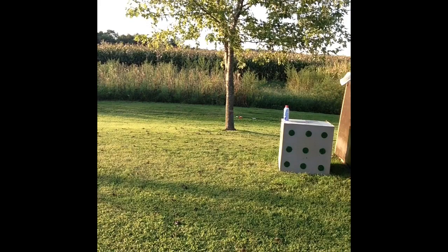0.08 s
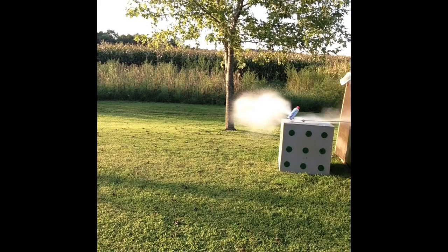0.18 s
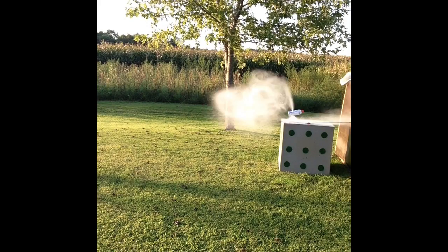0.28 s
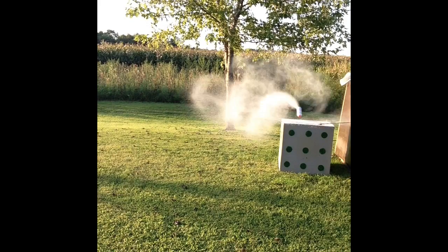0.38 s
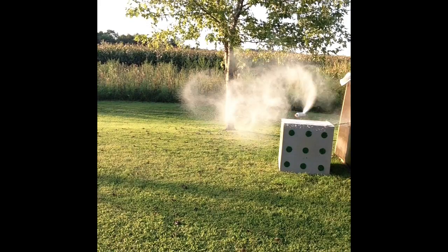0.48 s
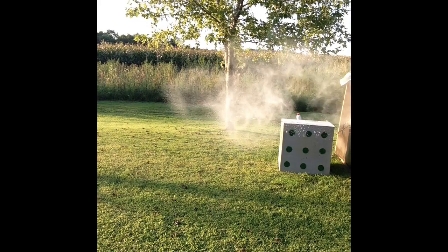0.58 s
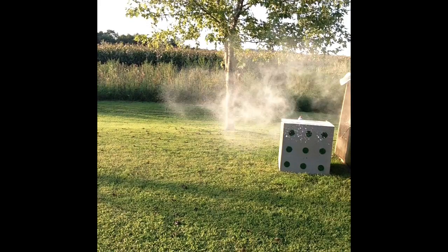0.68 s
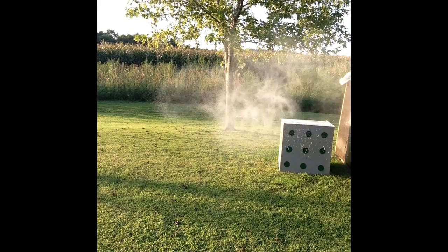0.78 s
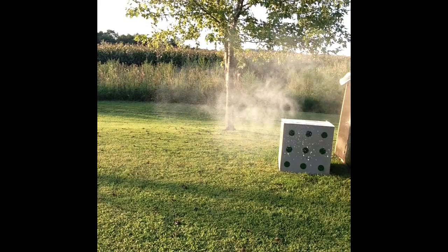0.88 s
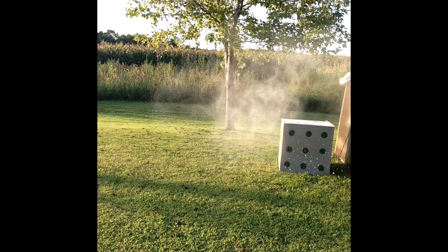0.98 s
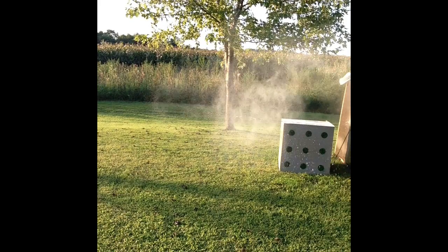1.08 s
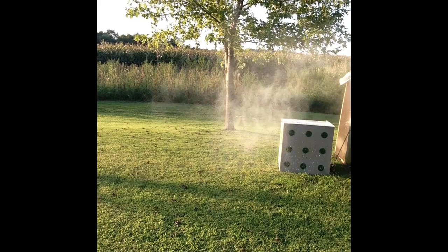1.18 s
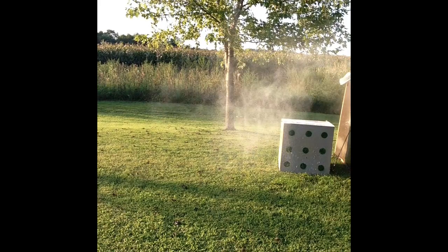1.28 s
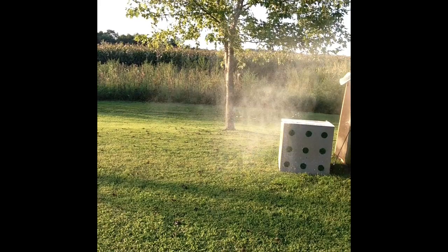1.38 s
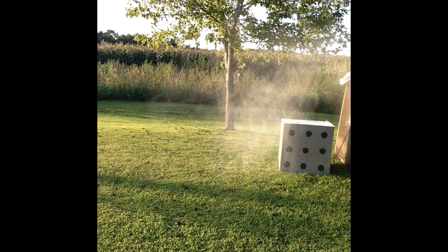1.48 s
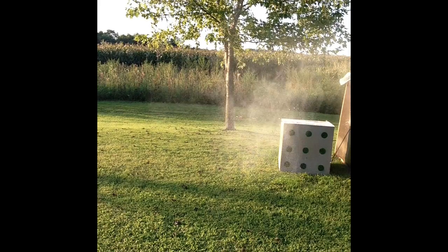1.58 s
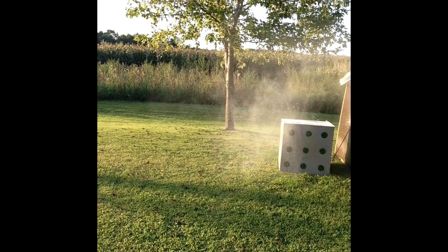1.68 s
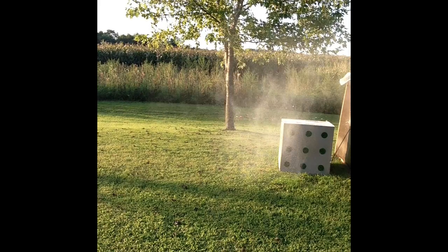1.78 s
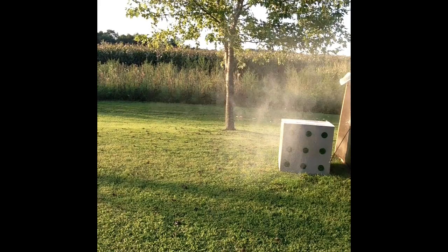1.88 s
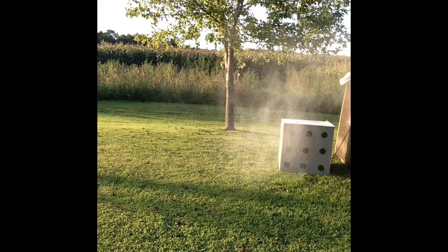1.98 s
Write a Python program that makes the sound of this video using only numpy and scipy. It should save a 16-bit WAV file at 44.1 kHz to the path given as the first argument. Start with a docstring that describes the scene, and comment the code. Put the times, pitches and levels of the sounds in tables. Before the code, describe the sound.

A pressurized plastic bottle is struck and bursts with a sharp bang outdoors among chirring crickets

```python
"""Bursting bottle in a back yard

An arrow strikes a pumped-up plastic bottle of powder on a foam block; it cracks, then bursts.
Bottle, foam and fallen pieces are sums of decaying modes; the freed air is one swing of sagging pitch.
The rush of air and the long echo of trees and corn are noise shaped in time and frequency.
Crickets chirr throughout: two near tones with pulsed envelopes before a chorus of narrow noise bands.
"""
import sys
import numpy as np
from scipy import signal
from scipy.io import wavfile
from scipy.ndimage import uniform_filter1d

SR = 44100
rng = np.random.default_rng(int(sys.argv[2]) if len(sys.argv) > 2 else 0)


def to_wav(sig):
    """Store sig (one row per channel, or 1-D mono) as 16-bit WAV at the path in sys.argv[1].

    Samples outside -1..1 are clipped; the rate is SR.
    """
    pcm = np.clip(np.atleast_2d(sig), -1, 1) * 32767
    pcm = np.round(pcm).astype(np.int16)
    wavfile.write(sys.argv[1], SR, pcm.T)  # frames by channels


def boost_factor(decibels):
    """Convert a level in decibels to a linear amplitude factor."""
    exponent = np.asarray(decibels, float) / 20
    return 10 ** exponent


N = 88200
TIME = np.arange(N) / SR


def evened(x):
    """Normalization: scales a signal to unit rms."""
    return x / np.sqrt(np.mean(x ** 2) + 1e-20)


def curve(points, t):
    """Piecewise-linear interpolation: reads a level contour at the times t."""
    return np.interp(t, *np.transpose(points))


NEAR_S, FAR_S = 0.33, 0.87  # a drifting colour moves from the first to the second between these times


def hiss(hue, later_hue=None, patchy_db=1.0, flicker_db=0.0, size=512):
    """Short-time spectral synthesis: random spectra of one colour, or drifting to a second, in patches."""
    hop = size // 4
    frames, hz = N // hop + 5, np.fft.rfftfreq(size, 1 / SR)
    real, imag, patches = rng.standard_normal((frames, len(hz), 3)).T  # each is (frequency, frame)
    patches = uniform_filter1d(patches, size // 64, 0)
    patches = evened(uniform_filter1d(patches, 4096 // size, 1))
    flicker = evened(uniform_filter1d(rng.standard_normal(frames), 3))

    def spectrum_db(points):
        point_hz, point_db = np.transpose(points)
        return np.interp(np.log(hz + 1), np.log(point_hz), point_db)[:, None]

    early, late = spectrum_db(hue), spectrum_db(later_hue or hue)
    share = np.clip((np.arange(frames) * hop / SR - NEAR_S) / (FAR_S - NEAR_S), 0, 1)
    gain = boost_factor(early + (late - early) * share)
    gain = gain / np.sqrt(np.mean(gain ** 2, 0))  # equal power in every frame
    spectra = (real + 1j * imag) * gain * boost_factor(patchy_db * patches + flicker_db * flicker)
    return evened(signal.istft(spectra, nperseg=size, noverlap=size - hop)[1][:N])


def decaying_mode(hz, db, t60, t):
    """Damped oscillation: a sine that loses 60 dB in t60 seconds."""
    return boost_factor(db - 60 * t / t60) * np.sin(2 * np.pi * hz * t)


def strike(events, modes_of, rise_s):
    """Modal superposition: each event (time, strength, ..) rings its modes after a linear rise."""
    out, t = np.zeros(N + SR), np.arange(SR // 4) / SR
    for event in events:
        ring = sum(decaying_mode(hz, db, t60, t) for hz, db, t60 in modes_of(event))
        start = round(event[0] * SR)
        out[start:start + len(t)] += boost_factor(event[1]) * np.minimum(t / rise_s, 1) * ring
    return out[:N]


def favoured(modes, centre_hz):
    """Selective excitation: modes speak less, the more octaves they lie from the favoured pitch."""
    loss_db_per_octave = 7.5
    return [(hz, db - loss_db_per_octave * abs(np.log2(hz / centre_hz)), t60) for hz, db, t60 in modes]


# colour of the air, with a low far drone: (frequency [Hz], relative level [dB])
AIR_HUE = [(30, -8), (70, 7), (115, 9), (180, -5), (400, -4.5), (1000, -11), (1700, -11), (3000, -5.5),
           (4800, 4), (6700, 7.5), (7500, 1.5), (9000, -42.5)]


def air():
    """Stationary ambient noise: the air of the yard as a steady coloured hiss."""
    return boost_factor(-62) * hiss(AIR_HUE, patchy_db=3.4, size=2048)


# colour of a soft rustle: (frequency [Hz], relative level [dB])
RUSTLE_HUE = [(150, -51), (250, -20), (496, 6), (646, -7.5), (953, 1), (1430, -0.5), (1800, -6), (2340, 2),
              (3960, -120)]


def rustle():
    """Gated noise: a soft rustle from the start that stops at 0.38 s."""
    return boost_factor(-60.5) * hiss(RUSTLE_HUE, patchy_db=1.0) * (TIME < 0.38)


# bands of far insects: (centre [Hz], bandwidth [Hz], level [dB])
INSECT_BANDS = [(1990, 150, -68), (2300, 260, -60.5), (2666, 260, -61), (3370, 250, -61.5), (3636, 74, -65),
                (3800, 460, -58), (3830, 74, -62), (4235, 300, -62.5)]


def chorus():
    """Incoherent superposition: many far insects blur into throbbing resonant noise bands."""
    out = np.zeros(N)
    for hz, width, db in INSECT_BANDS:
        radius = np.exp(-np.pi * width / SR)
        noise = [1, 1j] @ rng.standard_normal((2, N))
        noise = signal.lfilter([1], [1, -2 * radius, radius * radius], noise)
        band = evened((noise * np.exp(2j * np.pi * hz * TIME)).real)  # shifted up to its centre
        throb = uniform_filter1d(rng.standard_normal(N), 900)
        throb = evened(uniform_filter1d(throb, 900))
        out += boost_factor(db + 2.2 * throb) * band
    return out


# near singers: (centre of first chirp [s], period [s], mean pitch [Hz], chirp length [s], mean level [dB])
NEAR_CRICKETS = [(.020, .0719, 3865, .026, -50), (.025, .1343, 3645, .045, -51)]


def crickets():
    """Amplitude modulation: two near singers pulse nearly pure tones, each at its own steady rate."""
    out = np.zeros(N)
    for first, period, hz, length, db in NEAR_CRICKETS:
        since = TIME - first + period / 2
        count = (since // period).astype(int) + 1
        strength = boost_factor(db + 1.6 * rng.standard_normal(count.max() + 1))[count]  # differs per chirp
        u = np.clip((since % period - period / 2) / length, -0.5, 0.5)
        waver_hz = 12 * evened(uniform_filter1d(rng.standard_normal(N), 1500))
        tone = np.sin(2 * np.pi * np.cumsum(hz + waver_hz) / SR)
        out += strength * np.cos(np.pi * u) ** 2 * tone
    return out


# pieces landing on the grass: (time [s], strength [dB], softness [0-1])
LANDINGS = [(1.134, -39.5, .1), (1.140, -42, 0), (1.180, -43.5, 1), (1.203, -42.5, 0.17),
            (1.215, -37, 0.45), (1.221, -42, 0), (1.234, -42, 0.3), (1.242, -36, 0.33), (1.252, -59, 0.4),
            (1.262, -43, 0.67), (1.28, -47.5, 1), (1.345, -51, 0.7), (1.37, -58, 1), (1.395, -54, 1)]
# plastic modes before random detuning: (frequency [Hz], level [dB], decay T60 [s])
PIECE_MODES = [(366, 1, 0.054), (447, 1, 0.046), (586, 1.5, 0.033), (760, -11, 0.027), (940, -8, 0.048)]


def pieces():
    """Impact excitation: hard landings ring the plastic, soft ones only push the turf."""
    turf_hz, turf_t60_s = 116.6, 0.17  # pitch before random detuning

    def modes(landing):
        softness = landing[2]
        hard_db, soft_db = 20 * np.log10(np.clip([1 - softness, softness], 0.01, 1))
        plastic = [(hz * rng.uniform(0.886, 1.08), db + hard_db, t60) for hz, db, t60 in PIECE_MODES]
        return plastic + [(turf_hz * rng.uniform(0.79, 1.143), soft_db, turf_t60_s)]

    return strike(LANDINGS, modes, rise_s=0.0024)


# faint echo of a far tree line: (frequency [Hz], relative level [dB])
HORIZON_HUE = [(150, -43.5), (300, -17.5), (700, -16), (1400, -12.5), (2200, -15.5), (2900, -44)]
# its course: (time [s], level [dB])
HORIZON_COURSE = [(.8, -52.5), (1.1, -58), (1.4, -56), (1.55, -65), (1.8, -77)]


def horizon():
    """Distant reflection: a far tree line returns a late, faint noise."""
    return boost_factor(curve(HORIZON_COURSE, TIME)) * hiss(HORIZON_HUE, patchy_db=2.5, size=1024)


# echo of trees and corn, its course: (time [s], level [dB])
ECHO_COURSE = [(.235, -46), (.27, -17.5), (.40, -14.5), (.47, -17.5), (.56, -20.5), (.64, -22),
               (.70, -26.5), (.74, -30), (.80, -33.5), (.92, -45), (1.05, -54.5), (1.2, -74.5)]
# its early colour: (frequency [Hz], relative level [dB])
NEAR_HUE = [(40, -41.5), (200, -23), (500, -12.5), (950, -11.5), (1800, -13.5), (2900, -18), (3600, -12),
            (5500, -23.5), (7500, -29), (9000, -56)]
# its later colour, from farther off: (frequency [Hz], relative level [dB])
FAR_HUE = [(40, -41.5), (200, -14.5), (500, -9), (950, -3.5), (1800, -5), (2900, -1.5), (4100, -3),
           (5500, -5.5), (7500, -13), (9000, -56)]


def echo():
    """Diffuse scattering: trees and corn return a long hiss whose colour drifts from near to far."""
    noise = hiss(NEAR_HUE, FAR_HUE, patchy_db=0.5, flicker_db=0.4, size=1024)
    return boost_factor(curve(ECHO_COURSE, TIME)) * noise


# low roll of the bang: (frequency [Hz], relative level [dB])
BOOM_HUE = [(30, -23), (70, -3.5), (110, 3.5), (170, -3.5), (230, -25.5), (400, -31.5)]
# its course: (time [s], level [dB])
BOOM_COURSE = [(.24, -57), (.28, -27.5), (.44, -40), (.5, -41), (.65, -41.5), (.8, -47), (.95, -60),
               (1.1, -78), (1.3, -83)]


def boom():
    """Low-frequency reverberation: the roll of the bang as patchy bass noise."""
    return boost_factor(curve(BOOM_COURSE, TIME)) * hiss(BOOM_HUE, patchy_db=3.5, size=2048)


# modes of rattling plastic scraps: (frequency [Hz], level [dB], decay T60 [s])
SCRAP_MODES = [(356, -0.5, 0.01), (520, -1, .04), (677.6, -6, 0.01), (850, -4, 0.062), (950, 0, .035),
               (1216, -9, 0.01), (1590, -8, .015), (2160, -7.5, .015)]


def crackle():
    """Poisson-like impulses: random ticks of scraps, each ringing one randomly chosen mode."""
    rate_per_s, spread_db = 900, 3
    t, which = np.arange(2000) / SR, rng.integers(0, len(SCRAP_MODES), N)
    heights = boost_factor(spread_db * np.minimum(rng.exponential(1, N), 3))
    ticks = heights * (rng.random(N) < rate_per_s / SR)
    out = np.zeros(N)
    for k, (hz, db, t60) in enumerate(SCRAP_MODES):
        out += signal.oaconvolve(ticks * (which == k), decaying_mode(hz, db, t60, t))[:N]
    return evened(out)


# near rush of air and powder, its course: (time [s], level [dB])
RUSH_COURSE = [(.2095, -53), (.2115, -14.5), (.217, -21.5), (.224, -26), (.2415, -19.5), (.2445, -16.5),
               (.258, -7.5), (.272, -11), (.285, -17.5), (.31, -16), (.38, -21), (.44, -42), (.55, -77)]
# its colour: (frequency [Hz], relative level [dB])
RUSH_COLOUR = [(40, -50), (200, -39), (450, -11.5), (900, -8), (1600, -11.5), (2600, -14.5), (3600, -19),
               (5500, -20.5), (7600, -33.5), (9000, -61.5)]


def rush():
    """Turbulent jet noise: air and powder rush out, with the scraps rattling 3 dB below the hiss."""
    jet = hiss(RUSH_COLOUR, patchy_db=3, size=256)
    return boost_factor(curve(RUSH_COURSE, TIME)) * (jet + boost_factor(-3) * crackle())


def blast():
    """Causality: the rush and all its returns are silent until the rush begins."""
    return (rush() + echo() + boom() + horizon()) * (TIME > RUSH_COURSE[0][0])


# foam thumped by the blast, then single returns from the shed and trunks:
# (time [s], strength [dB], favoured pitch [Hz])
FOAM_THUMPS = [(.2465, -17, 700), (.2515, -9, 899), (.2582, -5.5, 350), (.2612, -1.5, 350),
               (.2640, -16, 300), (.306, -8.5, 900), (.330, -32.5, 450), (.343, -7, 520), (.368, -9.5, 520),
               (.374, -20, 520), (.399, -20, 940), (.415, -16.5, 940), (.428, -12, 150)]
# dull foam modes: (frequency [Hz], level [dB], decay T60 [s])
FOAM_MODES = [(150, -3.5, .07), (350, 8, 0.0252), (520, -1, .05), (684, -5.5, 0.038), (940, 3, 0.037)]


def block():
    """Damped resonance: low modes of the foam, with inverted polarity."""
    return -strike(FOAM_THUMPS, lambda thump: favoured(FOAM_MODES, thump[2]), rise_s=0.0011)


def pop():
    """Gas expansion: one swell of freed air that swings ever slower as the cloud grows."""
    start_s, peak_after_s, level_db = 0.247, 0.013, -10.5
    from_hz, to_hz, sag_s = 433, 69.4, 0.0093
    t = np.maximum(TIME - start_s, 0)
    hz = to_hz + (from_hz - to_hz) * np.exp(-t / sag_s)
    u = t / peak_after_s
    swell = u ** 2 * np.exp(2 - 2 * u)
    return boost_factor(level_db) * swell * np.sin(2 * np.pi * np.cumsum(hz * (t > 0)) / SR)


def snap():
    """Pressure release: the wall tears open in one sharp pulse with a weaker opposite tail."""
    start_s, width_s, scale_db = 0.2455, 0.0001, 4
    u = np.maximum(TIME - start_s, 0) / width_s
    return boost_factor(scale_db) * np.e * u * (1 - u / 3) * np.exp(-u)


# blows on the bottle: (time [s], strength [dB], favoured pitch [Hz])
BOTTLE_BLOWS = [(.2110, -4, 4400), (.2118, -0.5, 850), (.2133, -8, 1900), (.2144, -13.5, 1900),
                (.2154, -17.5, 1900), (.2335, -16.5, 1900), (.2436, -11, 865), (.2745, -10, 950),
                (.2865, 1, 950)]
# short plastic modes: (frequency [Hz], level [dB], decay T60 [s])
BOTTLE_MODES = [(700, -7, 0.013), (950, -0.5, 0.013), (1566, -6.5, 0.0096), (1900, 5, 0.012),
                (2530, -9, .008), (3022, -4.5, 0.00774), (4400, -20.5, 0.0028), (5664, -10.5, 0.013)]


def bottle():
    """Shell vibration: each blow rings the plastic, most near its favoured pitch, with the bass removed."""
    ring = strike(BOTTLE_BLOWS, lambda blow: favoured(BOTTLE_MODES, blow[2]), rise_s=0.0003)
    return signal.sosfilt(signal.butter(2, 350, "high", fs=SR, output="sos"), ring)


def scene():
    """Linear superposition: background, returns and burst add into one channel."""
    background = air() + rustle() + chorus() + crickets()
    burst = pieces() + blast() + block() + pop() + snap() + bottle()
    return (background + burst)[None]


def top_cut(x):
    """Nothing passes above the cut-off."""
    return signal.sosfilt(signal.butter(12, 8380, fs=SR, output="sos"), x)


def record(dry):
    """Dynamic compression: gain drops at the bang and creeps back, between bass cut and soft overload."""
    knee_db, squeeze, recover_db_per_s = -11.5, 0.47, 2  # recovery is that of the held power
    headroom, edge_hz = 1.05, 7750
    x = signal.sosfilt(signal.butter(3, 73.7, "high", fs=SR, output="sos"), dry)  # thin microphone bass
    power_db = 10 * np.log10(abs(uniform_filter1d(x[0] ** 2, 400)) + 1e-12)
    fall_db = TIME * recover_db_per_s
    held_db = np.maximum.accumulate(power_db + fall_db) - fall_db  # peak power, slowly released
    over_db = np.maximum(held_db - knee_db, 0)
    x = x / boost_factor(squeeze * over_db)
    x = headroom * np.tanh(x / headroom)
    band_limit = signal.firwin(767, edge_hz, window=("kaiser", 9), fs=SR)
    x = signal.oaconvolve(x, band_limit[None], "same")
    return top_cut(x)


dry = scene()
out = record(dry)
to_wav(out)
```